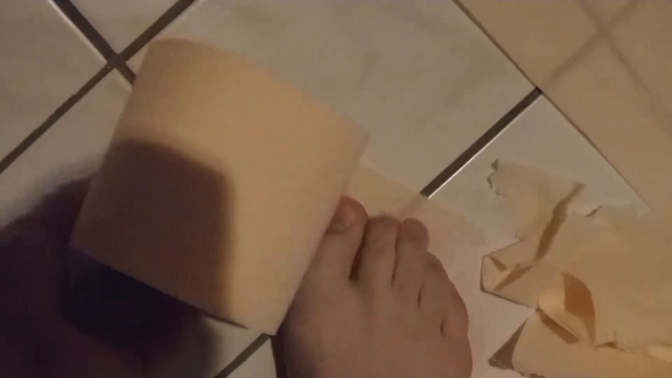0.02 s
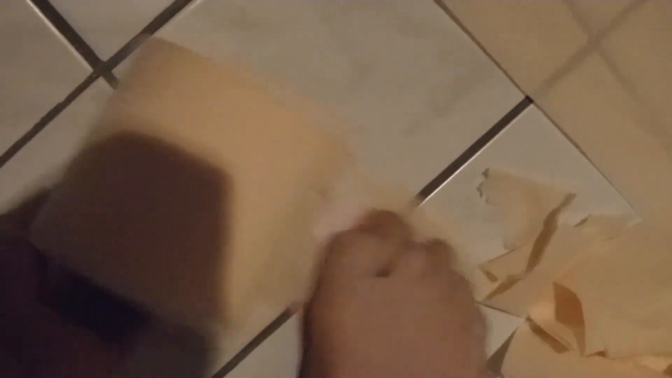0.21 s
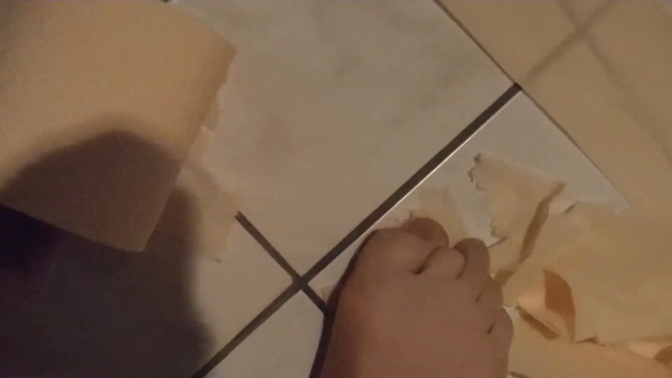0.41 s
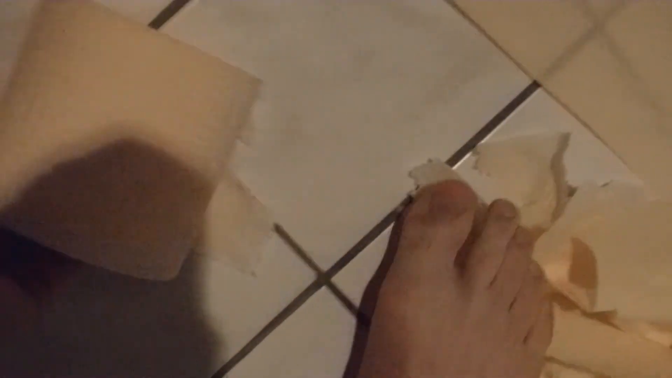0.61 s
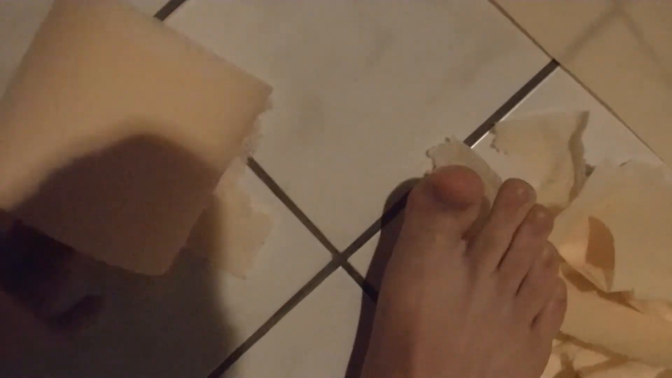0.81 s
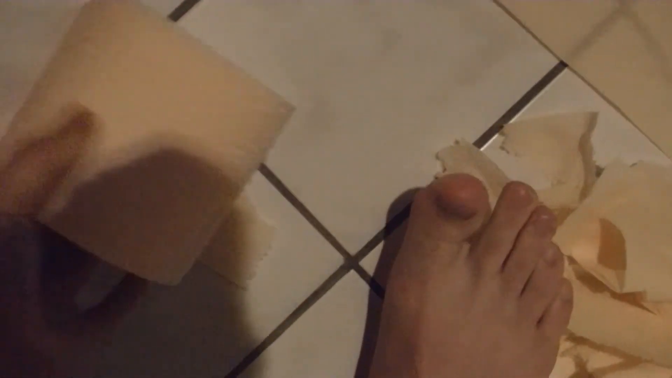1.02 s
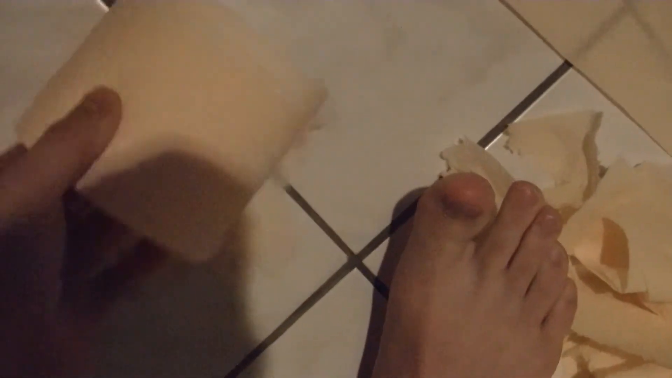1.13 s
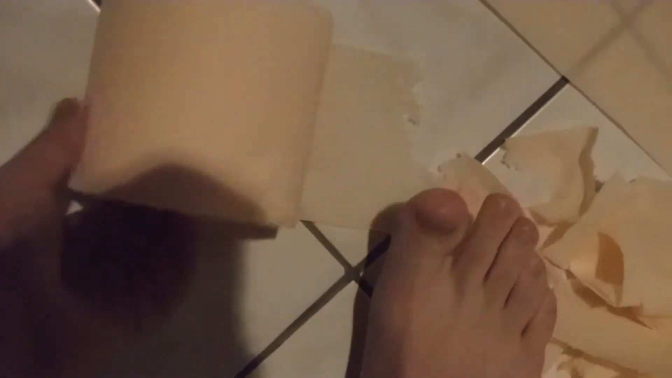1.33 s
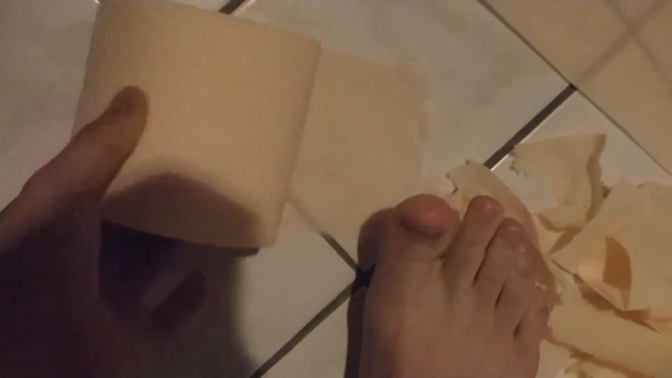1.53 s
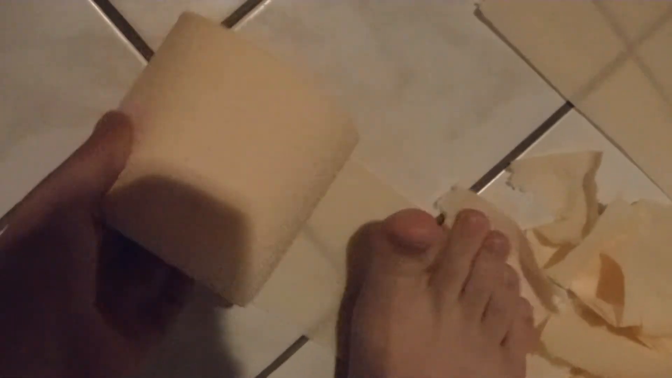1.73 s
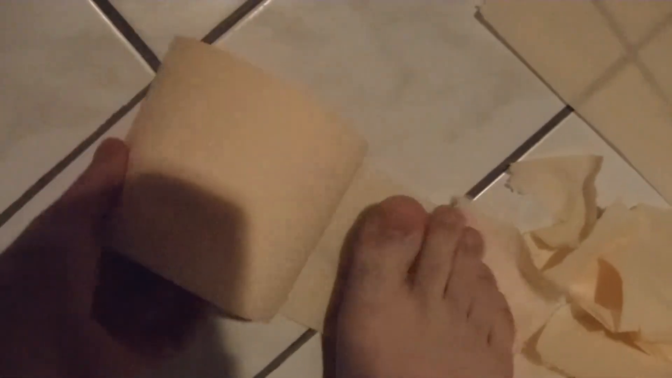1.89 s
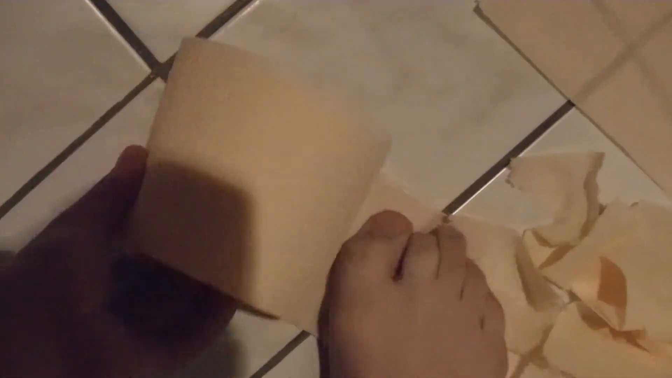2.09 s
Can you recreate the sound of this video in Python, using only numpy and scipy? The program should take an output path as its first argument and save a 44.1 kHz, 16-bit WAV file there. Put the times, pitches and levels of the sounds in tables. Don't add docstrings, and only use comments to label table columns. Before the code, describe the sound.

Close up in a small tiled bathroom, toilet paper tears with a quick snap and popping fibres, the roll knocks hollowly, then loose paper rubs softly over faint motor whirrs, low hum and steady hiss.

```python
import sys
import numpy as np
from scipy import signal
from scipy.fft import rfft, irfft
from scipy.io import wavfile
from scipy.ndimage import uniform_filter1d

SR = 44100
rng = np.random.default_rng(int(sys.argv[2]) if len(sys.argv) > 2 else 0)


def invert_db(x):
    u = np.asarray(x, float) / 20
    return 10 ** u


def store_pcm(level_fs):
    pcm = np.round(np.clip(level_fs, -1, 1) * 32767).astype(np.int16)
    wavfile.write(sys.argv[1], SR, np.atleast_2d(pcm).T)


N = 92610
T = np.arange(N) / SR


def unit(x):
    return x / np.sqrt(np.mean(x ** 2))


def colour(x, points, scale=1):
    points = np.array(points, float)
    hz = np.maximum(np.arange(N // 2 + 1) * SR / N, 1)
    gain_db = np.interp(np.log(hz), np.log(points[:, 0]), points[:, 1])
    return irfft(rfft(x) * invert_db(scale * gain_db), N)


def ring(x, peaks, flip=-1):
    total = 0
    for k, (hz, width, db) in enumerate(peaks):
        band = signal.lfilter(*signal.iirpeak(hz, hz / width, SR), x)
        total = total + flip ** k * invert_db(db) * band / np.sqrt(width)
    return total


def roll(x, damp=1):
    # pitch_hz, level_db, fade_s (time to fall by 60 dB)
    tube_modes = [(310, -18, 0.036), (509, -13, 0.087), (644, -26, 0.1), (760, -5.5, 0.047), (810, 0, 0.05),
                  (974, 1, 0.022), (1080, 8.5, 0.011), (1200, -4, 0.055), (1600, -7, 0.0083),
                  (2215, 3, 0.01), (2900, -55, 0.017)]
    total = 0
    for hz, db, fade in tube_modes:
        pole = np.exp(2j * np.pi * hz / SR - np.log(1000) * damp / (fade * SR))
        total = total + invert_db(db) * signal.lfilter([1], [1, -pole], x).imag
    return total


def grains(per_s, scatter_db):
    when, sign, size = rng.random((3, 2, N))
    size = invert_db(-scatter_db * np.log(.02 + .98 * size))
    return (when < per_s / SR) * np.sign(sign - .5) * size


def gate(start, end, rise, fall):
    return np.clip((T - start) / rise, 0, 1) * np.clip((end - T) / fall + 1, 0, 1)


def walk(per_s):
    hold = int(SR / per_s)
    levels = np.repeat(rng.standard_normal(N // hold + 1), hold)
    return 1.2 * uniform_filter1d(levels, hold)[:N]


def microphone_hiss():
    # pitch_hz, level_db (per Hz)
    hiss_colour = [(15, -52), (25, -25.5), (382, 1.5), (1640, -1), (2090, -5), (2730, -6.5), (7220, -13),
                   (9720, -10), (15800, -11)]
    hiss = unit(colour(rng.standard_normal((2, N)), hiss_colour)) * invert_db(-55.5)
    return colour(hiss, [(9000, 0), (15000, -7)])


def room_hum(near):
    # pitch_hz, width_hz, level_db
    bathroom_modes = [(232, 5, 3), (305, 7, -3), (380, 10, -9), (525, 9, -4)]
    steady = unit(ring(rng.standard_normal((2, N)), bathroom_modes)) * invert_db(-75.5)
    hum = steady + invert_db(4) * ring(near[0], bathroom_modes)
    return colour(hum, [(100, -25), (200, -4.5), (700, 5.0), (1500, -24)])


def motor():
    # start_s, end_s, level_db
    bursts = [(.01, 0.058, -0.5), (0.076, 0.096, 1), (0.106, 0.134, 1.5), (0.162, 0.175, 2),
              (.365, 0.38, 2), (0.391, 0.417, 3), (0.429, 0.453, 2), (0.466, 0.5, 1), (0.517, 0.546, 0),
              (0.581, 0.614, 7), (0.663, 0.677, 0), (0.686, 0.722, -4), (0.783, .815, 3), (.925, 0.943, -4),
              (0.957, 0.97, 6), (1.068, 1.088, 3), (1.116, 1.172, 0), (1.2, 1.22, 2), (1.366, 1.392, 2),
              (1.395, 1.418, -0.5), (1.479, 1.494, 2.5), (1.508, 1.536, 3), (1.54, 1.57, 1),
              (1.625, 1.647, -3), (1.683, 1.72, 2.5), (1.84, 1.857, 2), (1.877, 1.932, -2),
              (1.947, 1.97, -5), (2.04, 2.063, 0)]
    # pitch_hz, width_hz, level_db
    shell_modes = [(2050, 140, -10), (3830, 200, -6), (4040, 140, -7), (6500, 500, -8), (9580, 400, 0),
                   (11550, 550, -7)]
    steps_per_s, step_depth, motor_db = 160, 0.25, -58.5
    steps = 1 + step_depth * np.cos(2 * np.pi * steps_per_s * T)
    noise = rng.standard_normal((3, N))
    noise = noise[0] + noise[1:]
    shake = noise * steps * invert_db(2.1 * walk(58.35))
    shell = 0
    for hz, width, db in shell_modes:
        band = ring(shake, [(hz, width, db)])
        shell = shell + ring(band, [(hz, 2 * width, 0)]) * np.sqrt(width)
    running = sum(invert_db(db) * gate(start, end, .003, .004) for start, end, db in bursts)
    return unit(shell) * invert_db(motor_db) * running


def flickering(x):
    flicker_per_s, flicker_db = 30, 1.2
    edges = 500 * 2 ** np.arange(0, 5.2, .2)
    hz, spectrum = np.arange(N // 2 + 1) * SR / N, rfft(x)
    total = 0
    for low, high in zip(edges[:-1], edges[1:]):
        band = irfft(spectrum * (hz >= low) * (hz < high), N)
        total = total + invert_db(flicker_db * walk(flicker_per_s)) * band
    return total


def rubs():
    # middle_s, length_s, roll_db, sheet_db, tilt_db (per octave, plus is brighter)
    rub_times = [(0.114, 0.091, -60.5, -66, -3), (0.401, 0.12, -54.5, -57, -1.5),
                 (0.476, 0.046, -71, -55.5, -5.5), (0.527, 0.12, -60, -51.5, -1.5),
                 (0.618, 0.067, -58.5, -45.5, -1), (0.724, 0.31, -73, -52.5, -1),
                 (0.839, 0.055, -55, -53, -2), (0.909, 0.11, -65, -58.5, -6),
                 (0.989, 0.09, -60, -58.5, -2.5), (1.07, 0.078, -57, -60, -4),
                 (1.14, 0.073, -63, -48.5, -1), (1.196, 0.065, -58.5, -51, 2), (1.282, .12, -60, -47.5, 1),
                 (1.36, 0.19, -67.5, -59, 1.5), (1.505, 0.045, -62, -61, 2),
                 (1.559, 0.043, -86, -56.5, 8.5), (1.631, 0.13, -64, -49, 0),
                 (1.658, 0.024, -70, -59.5, 0.5), (1.719, 0.071, -72, -58.5, -3.5),
                 (1.758, 0.023, -61, -58, 2.5), (1.767, 0.089, -62, -48.5, 2.5),
                 (1.842, 0.074, -77, -55.5, 1), (1.915, 0.13, -66, -61.5, -0.5),
                 (1.989, 0.1, -70, -59, -2.5), (2.081, 0.093, -62.5, -53, -1.5)]
    # pitch_hz, level_db (per Hz)
    sheet_colour = [(710, -11), (1200, -3.5), (1610, -4.5), (2340, -4), (2910, -7.5), (3530, -7.5),
                    (8730, -8.5), (11700, -8), (15800, -19)]
    sheet = unit(flickering(colour(grains(12000, 2.2), sheet_colour)))
    body = unit(roll(grains(3000, 2.5), damp=1.2))
    out = 0
    for middle, length, roll_db, sheet_db, tilt in rub_times:
        swell = np.cos(np.pi / 2 * np.clip((T - middle) / length * 1.316, -1, 1)) ** 2
        brightness = [(750, -3 * tilt), (6000, 0.0089), (12000, tilt)]
        out = out + swell * invert_db(roll_db) * body
        out = out + invert_db(sheet_db) * colour(swell * sheet, brightness)
    return out


def flaps():
    # start_s, pitch_hz, level_db, fade_s (time to fall by 60 dB), rise_s
    notes_rung = [(.246, 748, -14.5, .1, .0025), (.2585, 720, -22, .05, .002),
                  (.2402, 1000, -24, .03, .001), (.255, 520, -34, .15, .006), (.262, 644, -27, .12, .006),
                  (.273, 1141, -23, .06, .004), (.277, 690, -28, .07, .004), (.288, 1545, -30, .06, .003),
                  (.298, 800, -26, .07, .008), (.309, 785, -24, .05, .004), (.3, 1280, -34, .08, .004),
                  (.34, 800, -38, .08, .006), (.33, 435, -50, .2, .015), (.375, 378, -52, .25, .015),
                  (.42, 550, -56, .15, .015), (.53, 530, -56, .15, .015), (.85, 305, -46, .3, .05),
                  (.84, 540, -55, .2, .015), (.89, 230, -55, .4, .05), (.36, 232, -60, .7, .03),
                  (.3, 305, -52, .25, .02), (.06, 530, -56, .3, .02), (.125, 510, -56, .2, .015),
                  (2.07, 1190, -55, .06, .006)]
    out = 0
    for start, hz, db, fade, rise in notes_rung:
        t = np.maximum(T - start, 0)
        strength = invert_db(db - 60 * t / fade) * (1 - np.exp(-t / rise))
        out = out + strength * np.sin(2 * np.pi * hz * t)
    waver = invert_db(1.5 * walk(120))
    return waver * out * np.array([[1], [0]])


def rip():
    # time_s, crackle_db, roll_db
    effort = [
        (0.125, -65.5, -43),
        (0.192, -43, -36),
        (0.239, -40, -44),
        (0.247, -25.5, -38),
        (0.262, -28, -24),
        (0.297, -32.5, -17),
        (0.334, -42.5, -29),
        (.38, -52.5, -53),
        (0.45, -63, -36),
    ]
    # time_s, level_db
    fibre_pops = [(.2408, -12.5), (.2465, -6), (.2492, -7), (.2525, -23), (.2553, -12), (.2598, -9),
                  (.2665, -13), (.2745, -15.5), (.2795, -34), (.2845, -17.5), (.291, -24), (.296, -20.5),
                  (.301, -25), (.3075, -22), (.315, -45), (.326, -32), (.352, -27.5), (.369, -32.5),
                  (.473, -45), (1.041, -44), (1.05, -45), (1.557, -36.5)]
    # pitch_hz, level_db (per Hz)
    rip_colour = [(880, -6.5), (1500, -5.5), (1720, -9.5), (2040, -10.5), (2790, -15.5), (3530, -13),
                  (11800, -17), (15800, -27.5)]
    time, crackle_db, roll_db = np.array(effort).T
    tearing = gate(time[0], time[-1], 0.033, 0.017)
    fibres = unit(colour(grains(7000, 3.5), [(400, -11)] + rip_colour))
    crackle = fibres * invert_db(np.interp(T, time, crackle_db)) * tearing
    push = grains(3500, 2.5) * invert_db(np.interp(T, time, roll_db)) * tearing
    pops = np.zeros((2, N))
    for start, db in fibre_pops:
        pops[:, int(start * SR)] -= invert_db(db + 19.0) * np.array([1, .15])
    snap = ring(pops, [(2070, 830, 34.5)])
    blows = signal.lfilter([.3], [1, -.8], push + pops)
    rattle = colour(roll(blows), [(230, -8.5), (305, -2.5), (400, -10), (600, 0.5)])
    return crackle + invert_db(-40.5) * rattle + invert_db(-9.5) * snap


def slides():
    # start_s, end_s, level_db, treble_db (share of the high resonances)
    finger_slides = [
        (0.7326, 0.786, -43.5, 5.5),
        (0.96, 1.023, -57, -7),
        (.815, .85, -58, -19),
    ]
    # pitch_hz, width_hz, level_db
    low_modes = [(4880, 310, -8), (5600, 350, -2), (6770, 580, 2.5)]
    high_modes = [(9000, 600, -3.5), (10800, 900, 0.5), (12200, 1000, 2), (14500, 1400, -7)]
    friction = grains(11000, 2.6)
    low, high = ring(friction, low_modes), ring(friction, high_modes)
    out = 0
    for start, end, db, treble_db in finger_slides:
        hiss = unit(low + invert_db(treble_db) * high)
        out = out + invert_db(db) * gate(start, end, .028, .003) * hiss
    return out


def scuffs():
    # start_s, end_s, level_db
    scrapes = [
        (0.826, 0.909, -51),
        (0.935, 1.02, -60),
        (1.038, 1.06, -57),
    ]
    # pitch_hz, width_hz, level_db
    scrape_modes = [(300, 14, -5), (530, 30, -5), (1390, 330, 0), (1750, 350, -5)]
    scrape = unit(ring(grains(3000, 3.), scrape_modes))
    return sum(invert_db(db) * gate(start, end, 0.0066, 0.03) * scrape for start, end, db in scrapes)


def at_microphone(near):
    # pitch_hz, level_db
    bass_loss = [(25, -47), (120, -30), (250, -14.5), (450, -2), (700, -0.5)]
    # pitch_hz, width_hz, level_db
    cavity_modes = [(4650, 400, -3.5), (6500, 1000, -3.5), (9700, 440, -17.5), (11650, 900, -9)]
    paper = colour(near, bass_loss)
    return paper + invert_db(21) * ring(paper, cavity_modes, flip=1)


def tiled_echo(paper):
    echo_db, fade_s, damp_hz = -13.5, 0.27, 5200
    t = T[:16384]
    tail = rng.standard_normal((2, 16384)) * invert_db(-60 * t / fade_s) * (t > .003)
    tail = signal.lfilter(*signal.butter(1, damp_hz, fs=SR), tail)
    tail = tail * invert_db(echo_db) / np.sqrt(np.sum(tail ** 2) / 2)
    return signal.fftconvolve(paper[:1], tail, axes=1)[:, :N]


def ports(pair):
    # pitch_hz, side_db (side against middle)
    side_width = [(60, -12), (110, -7), (200, -14), (380, -15), (700, -8.5), (1290, -10), (2380, -11.0),
                  (4400, -7.5), (8120, -3.5), (15000, 0.5)][2:]
    # pitch_hz, lean_db (left minus right)
    left_lean = [(200, 2), (700, 2.5), (1300, 2.3), (4400, -.5), (15000, -1)]
    middle, side = pair[0], colour(pair[1], side_width)
    left = colour(middle + side, left_lean, .5)
    right = colour(middle - side, left_lean, -.5)
    return np.array([left, right])


def scene():
    near = rip() + rubs() + slides() + scuffs()
    paper = at_microphone(near) + flaps()
    return ports(paper) + tiled_echo(paper) + motor() + microphone_hiss() + room_hum(near)


def top_cut(x):
    return signal.sosfilt(signal.butter(12, 16020, fs=SR, output="sos"), x)


def record(dry):
    treble_cut = signal.ellip(14, .3, 90, 15740, fs=SR, output="sos")
    mix = signal.sosfilt(treble_cut, dry)
    return top_cut(mix)


dry = scene()
out = record(dry)
store_pcm(out)
```